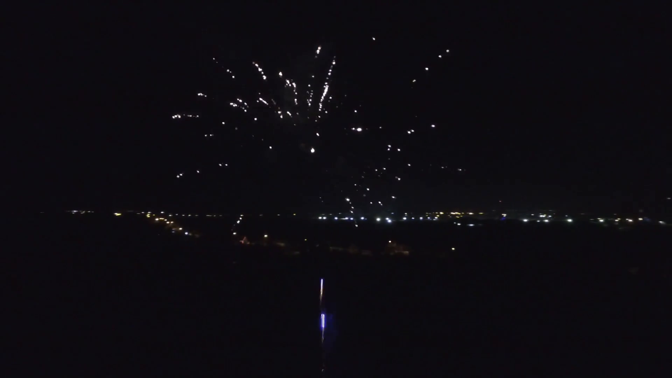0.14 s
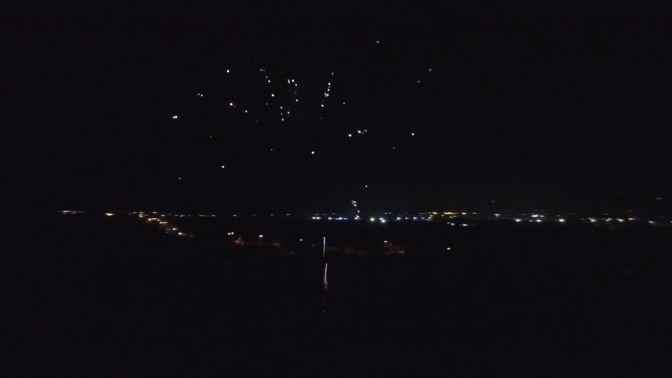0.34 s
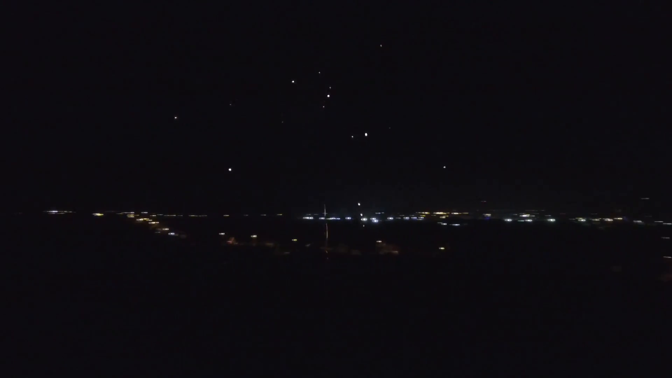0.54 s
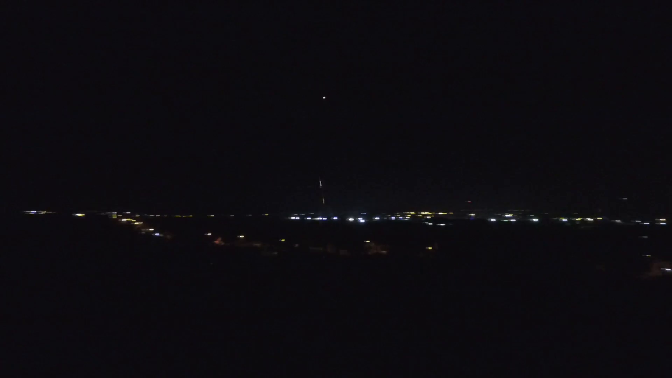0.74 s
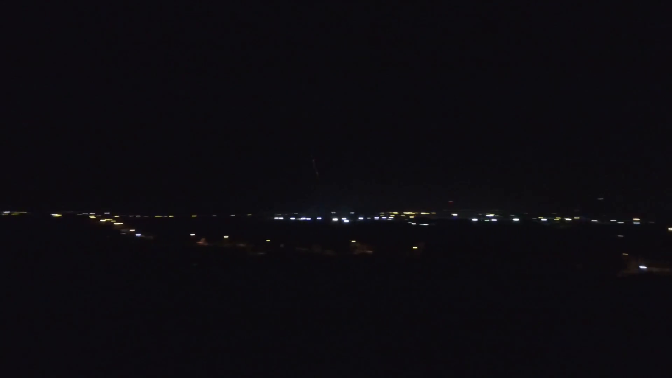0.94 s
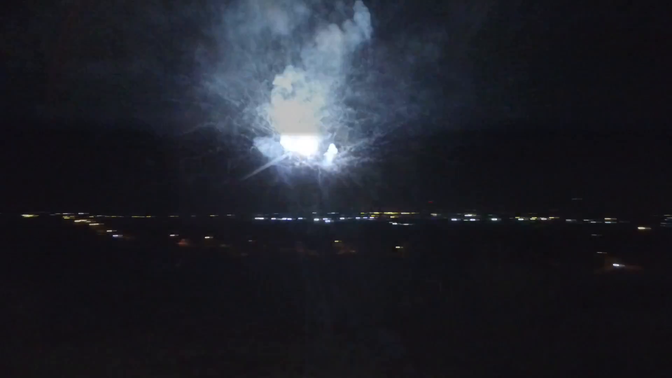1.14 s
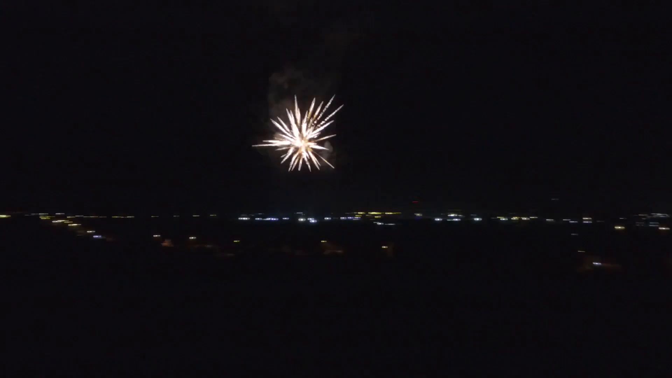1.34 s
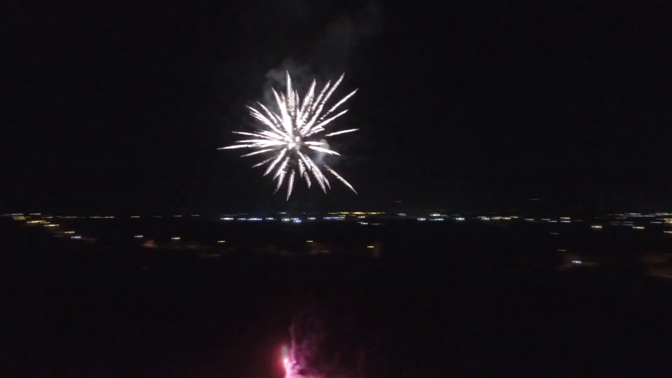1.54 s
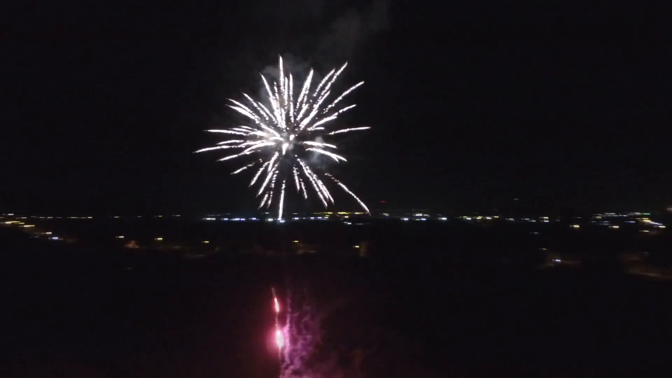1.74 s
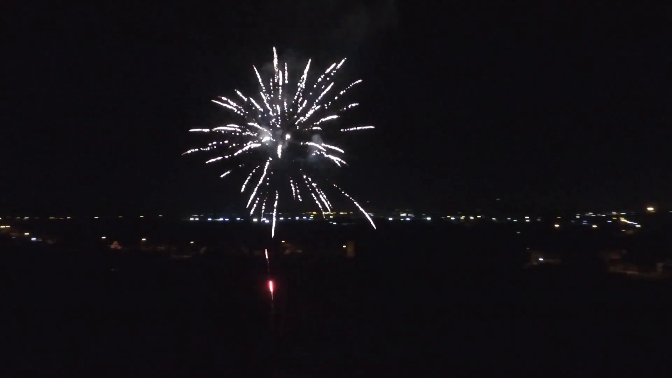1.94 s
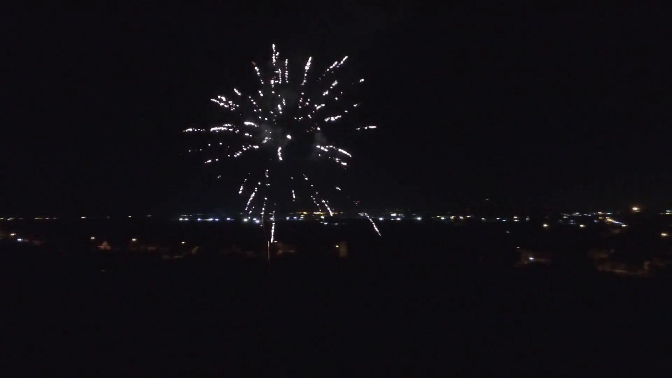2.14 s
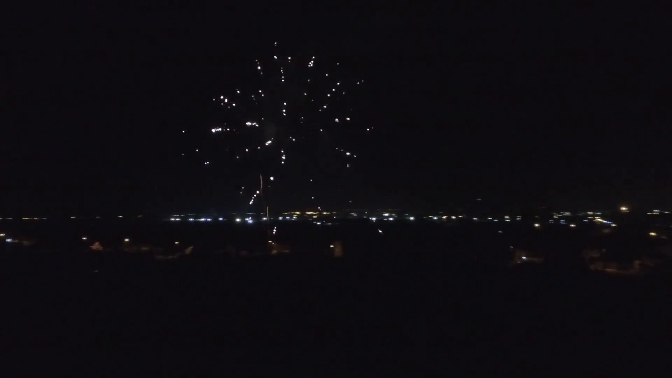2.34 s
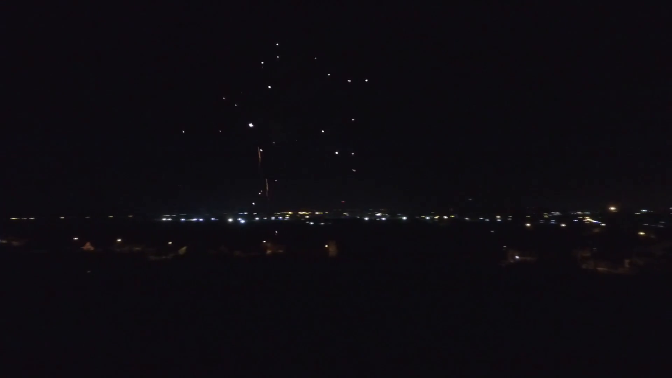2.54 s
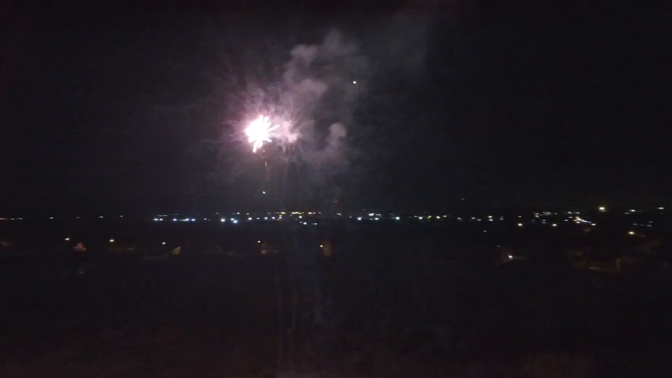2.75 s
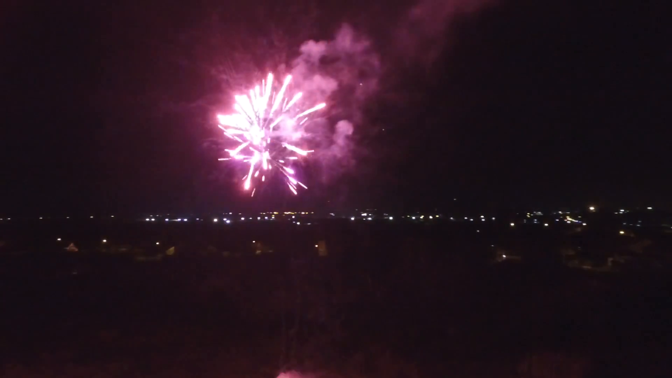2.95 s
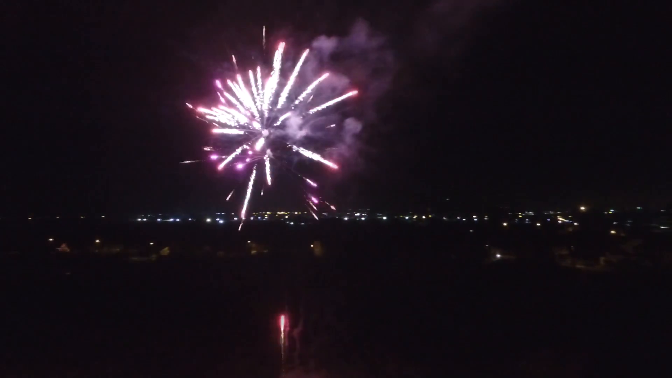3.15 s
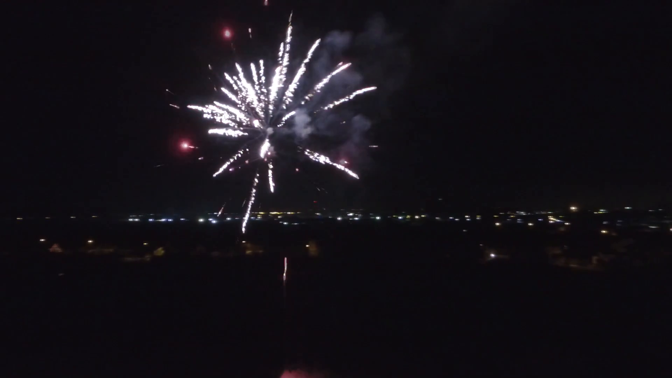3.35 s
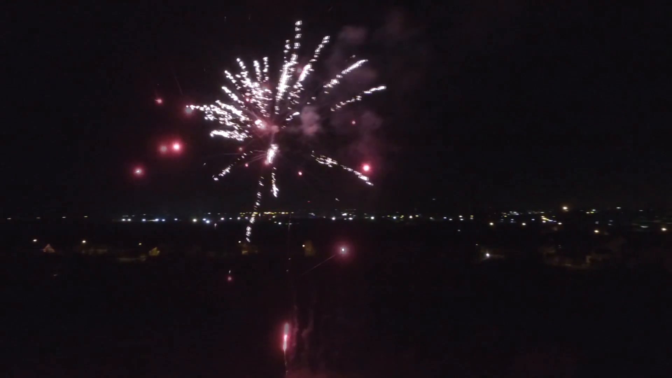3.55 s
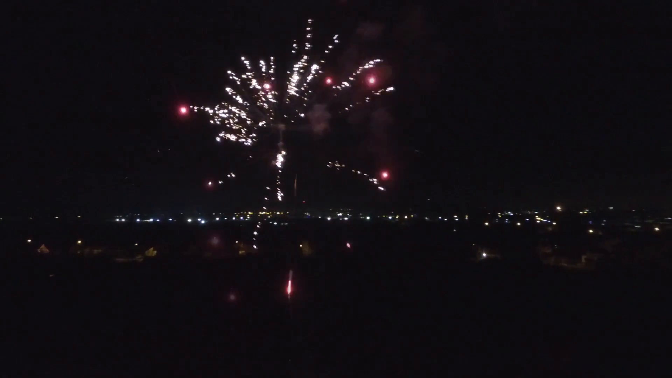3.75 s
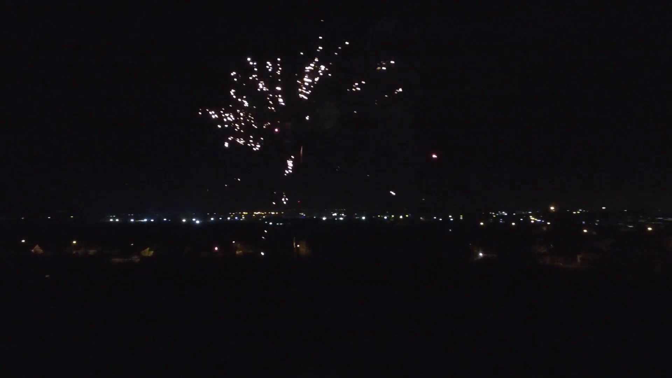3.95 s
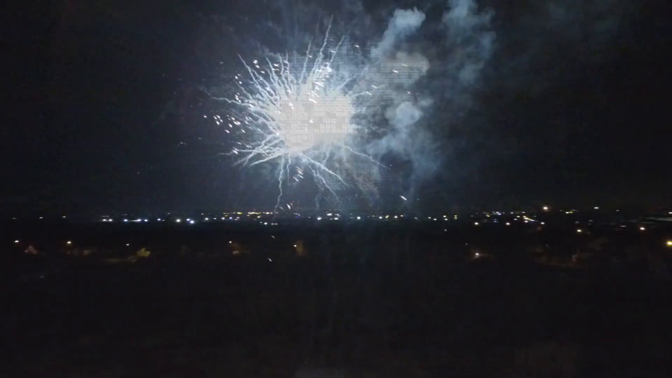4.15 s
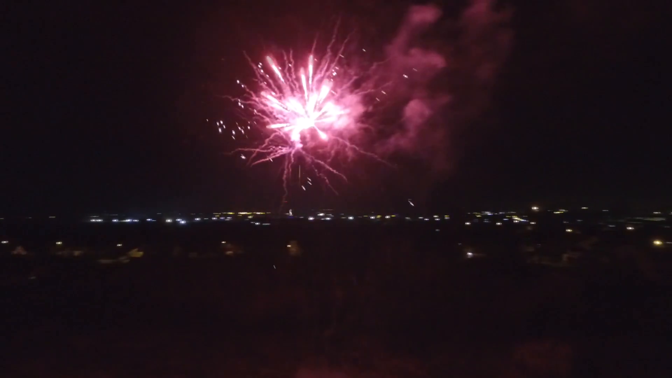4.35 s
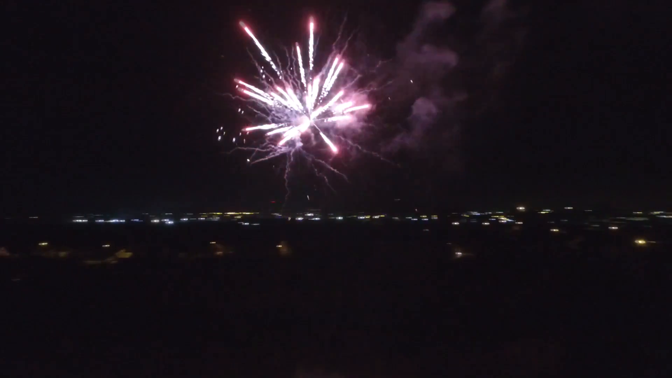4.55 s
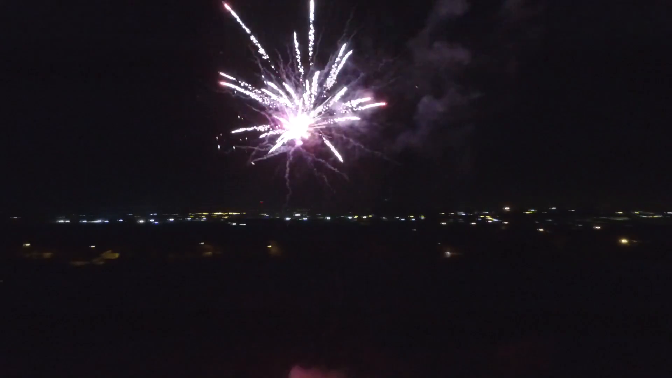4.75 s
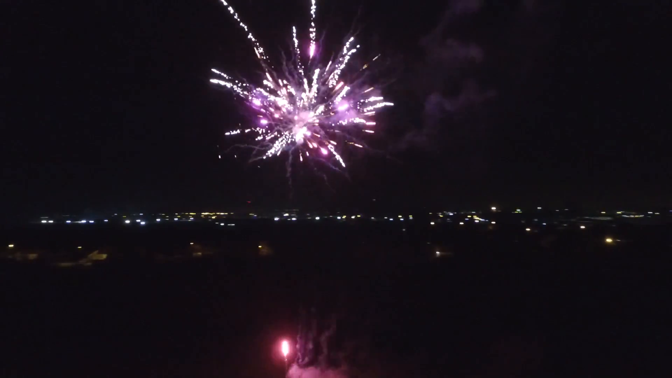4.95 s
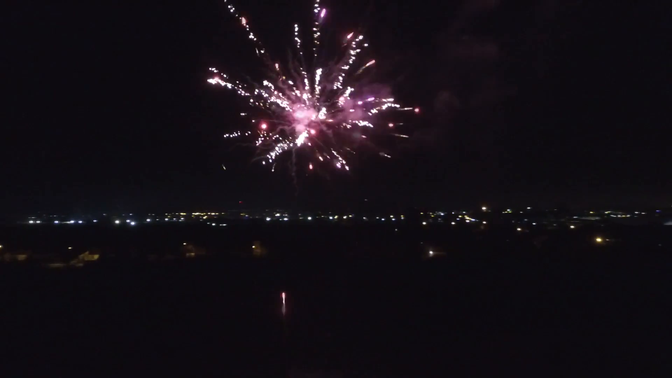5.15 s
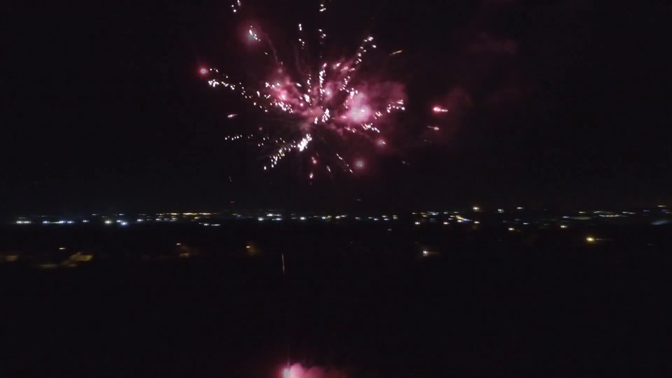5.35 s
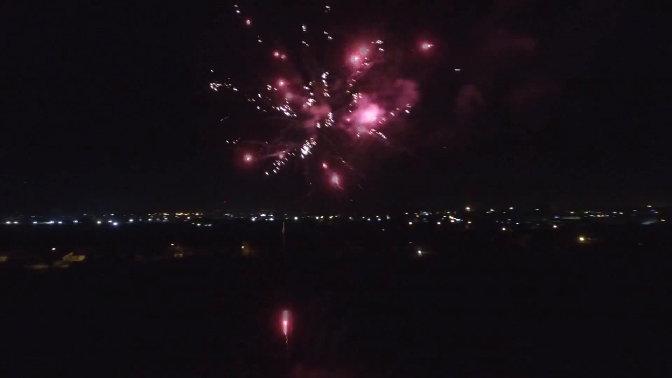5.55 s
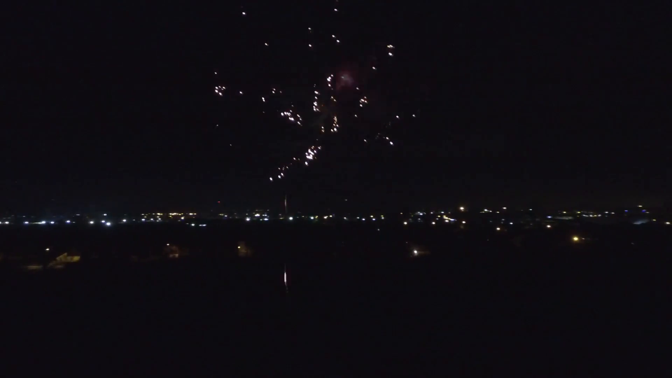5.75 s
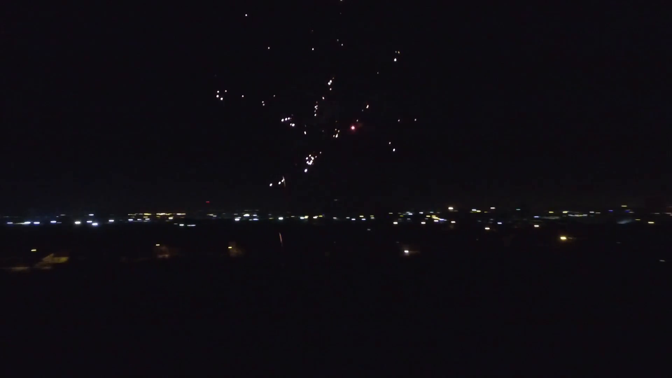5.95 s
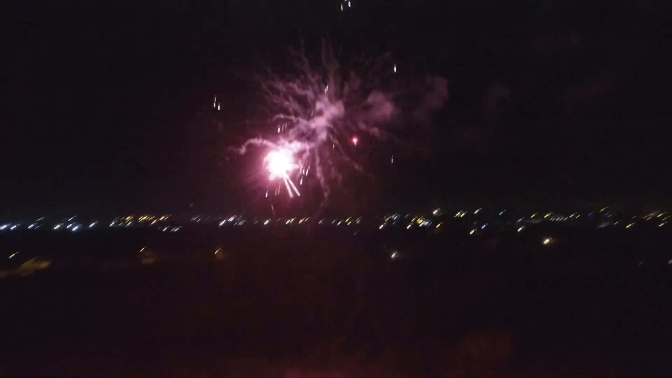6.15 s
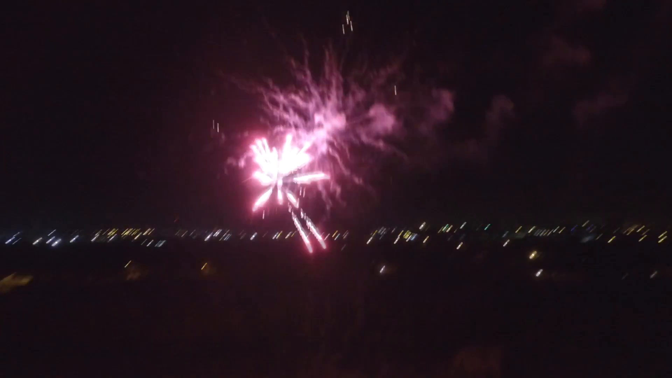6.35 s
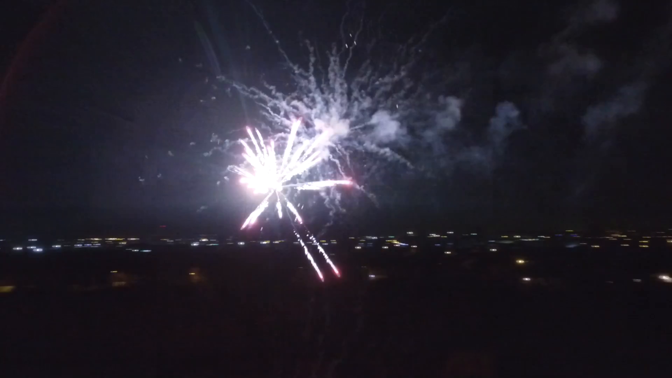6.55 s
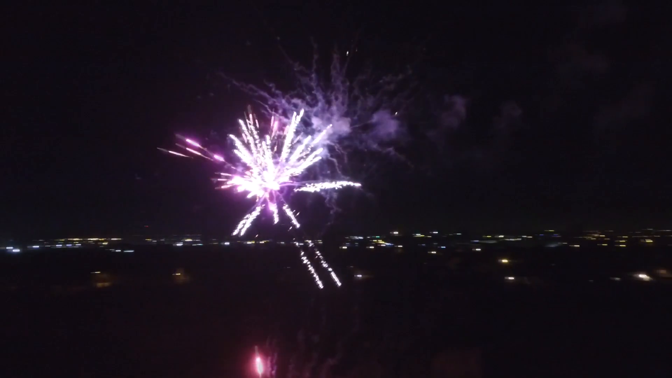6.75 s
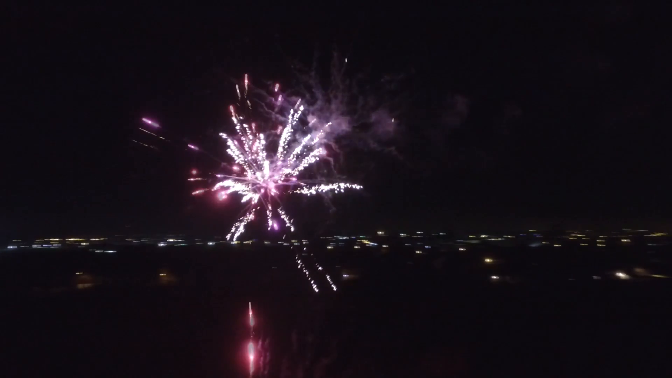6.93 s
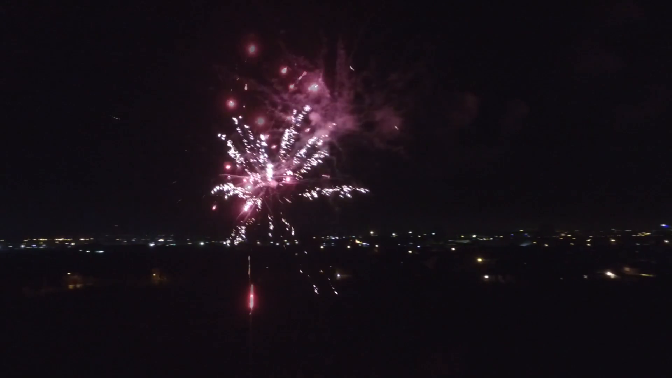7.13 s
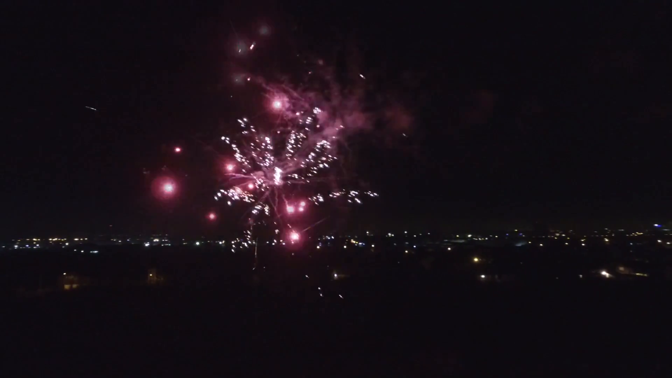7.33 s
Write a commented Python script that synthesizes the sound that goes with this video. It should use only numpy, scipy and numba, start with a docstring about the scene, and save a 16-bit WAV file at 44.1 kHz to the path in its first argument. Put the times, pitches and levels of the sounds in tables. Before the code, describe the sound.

Firework shells crack and thud overhead at night, often in quick pairs, over a sizzling fuse hiss and rolling echoes off a hillside.

```python
"""Sharp reports crack and thud on a hillside at night, over the hiss of a burning fuse and a long rolling answer.
A firework battery stands some tens of metres from a camera microphone. Fuse hiss and rolling land are coloured
noise; lift charges are noise cracks with a tube ring of decaying sines; shells overhead are a shock front and two
swings of thud, returned by the slope. The camera overloads on the fronts; its gain ducks, then creeps back up."""
import sys
import numpy as np
from scipy import signal
from scipy.fft import rfft, irfft
from scipy.io import wavfile
from scipy.ndimage import uniform_filter1d
from numba import njit

SR = 44100
rng = np.random.default_rng(int(sys.argv[2]) if len(sys.argv) > 2 else 0)


def convert_level_to_amplitude(level_db):
    """Map a level in decibels to its linear amplitude factor."""
    exponent = np.asarray(level_db, float) / 20
    return 10 ** exponent


def dump(signal):
    """Clip the signal to [-1, 1] and save it as 16-bit WAV at the path in sys.argv[1]."""
    limited = np.clip(np.atleast_2d(signal).T, -1, 1)
    pcm = np.round(limited * 32767).astype(np.int16)
    wavfile.write(sys.argv[1], SR, pcm)


N = 325894  # length in samples


def noise(colour, count=N):
    """Noise with the spectral shape of a colour table, scaled to rms 1."""
    hz, db = np.transpose(colour)
    f = np.fft.rfftfreq(count, 1 / SR) + 1
    shape = convert_level_to_amplitude(np.interp(np.log(f), np.log(hz), db))
    x = irfft(rfft(rng.standard_normal(count)) * shape, count)
    return x / x.std()


def add(out, start_s, sound):
    """Mixes a sound in from start_s on, cut at the ends of the scene."""
    i = int(round(start_s * SR))
    a, b = np.clip([i, i + len(sound)], 0, len(out))
    out[a:b] += sound[a - i:b - i]


def puff(colour, rise_ms, fall_ms):
    """A burst of noise that swells and dies away exponentially."""
    ms = np.arange(16384) / SR * 1000
    return noise(colour, count=16384) * (1 - np.exp(-ms / rise_ms)) * np.exp(-ms / fall_ms)


def walk(rate_hz):
    """Random levels, rate_hz of them a second, joined by straight slopes."""
    k = int(SR / rate_hz)
    return uniform_filter1d(np.repeat(rng.standard_normal(N // k + 1), k), k)[:N]


def band(hz, width_hz, level_db):
    """A narrow band of noise whose centre may drift: two slow random swings on a carrier."""
    phase = 2 * np.pi * np.cumsum(hz + np.zeros(N)) / SR
    slow = [(1, 0), (width_hz, -3), (3 * width_hz, -18), (20 * width_hz, -60)]
    return convert_level_to_amplitude(level_db) * (noise(slow) * np.sin(phase) + noise(slow) * np.cos(phase))


def patchy(x, spread_db, rate_hz):
    """Splits a sound into octaves that swell and sink each on its own."""
    octave, spectrum = np.log2(np.fft.rfftfreq(N, 1 / SR) + 1), rfft(x)
    out = np.zeros(N)
    for k in range(8, 14):  # octaves centred on 2 ** k Hz, the outer two left open
        share = np.clip(1 - np.abs(np.clip(octave, 8, 13) - k), 0, 1)
        out += convert_level_to_amplitude(spread_db * walk(rate_hz)) * irfft(spectrum * share, N)
    return out


# how fiercely the fuse burns: start_s [s], level_db [dB]
FUSE = [(0.0, -36.5), (.5, -32), (1.25, -36), (2.1, -26.5), (2.9, -27.5), (3.55, -30.5), (4.1, -27.5),
        (4.8, -27.5), (5.55, -34.5), (6.25, -31.5), (6.6, -32.5), (7.39, -31)]
# colour of the steady hiss: pitch_hz [Hz], level_db [dB per Hz, relative]
HISS = [(24, -50), (40, -12), (147, -1.5), (420, -9), (720, -5.5), (1000, -3.5), (1300, -7.5), (1700, -5.5),
        (2150, -16.5), (2500, -17), (2800, -10), (3800, -11.5), (4400, -9), (4700, -14.5), (5800, -8.5),
        (6400, -16), (9000, -17.5), (15000, -24.5), (15700, -45)]
# breathy bands, low to high: pitch_hz [Hz], half_width_hz [Hz], level_db [dB]
BANDS = [(991, 40, -7), (3307, 210, -8), (5150, 225, -4.5), (7200, 560, -10)]
# swells of the upper two bands: crest_s [s], level_db [dB]
SIZZLES = [(1.05, -2.5), (2.8, 1.5), (4.3, -4.5), (6.15, 1), (7.45, -7)]


def fuse():
    """Burning fuse: steady hiss, plus breathy bands that drift, the upper ones sizzling up and down."""
    rest_db, rise_s, fall_s = -10.5, 0.57, 0.35
    drift = 0.015  # share by which the band centres wander
    t = np.arange(N) / SR
    low, mid, high, top = (band(hz * (1 + drift * walk(3)), width_hz, db) for hz, width_hz, db in BANDS)
    sizzle = convert_level_to_amplitude(rest_db) + np.zeros(N)
    for crest_s, db in SIZZLES:
        sizzle += convert_level_to_amplitude(db) * np.exp(-((t - crest_s) / np.where(t < crest_s, rise_s, fall_s)) ** 2)
    level_db = np.interp(t, *np.transpose(FUSE)) + 3.1 * walk(6)
    return convert_level_to_amplitude(level_db) * (noise(HISS) + low + mid + sizzle * (high + top))


# stretches of land that answer a burst: delay_s [s], level_db [dB], spread_s [s]
LAND = [(0.021, 5.5, 0.015), (.092, 2.5, 0.019), (.23, 1.5, .035), (.37, -5.5, 0.11)]
# colour of the rolling answer: pitch_hz [Hz], level_db [dB per Hz, relative]
ROLL = [(24, -51), (40, -8.5), (263, 4), (412, -1), (514, -27), (1030, -4), (1570, 0.5), (5160, -14),
        (15000, -42)]
# colour of the low rumble: pitch_hz [Hz], level_db [dB per Hz, relative]
RUMBLE = [(80, -19), (220, -3), (330, -3.5), (550, -1.5), (900, -2.5), (2000, -54)]


def roll():
    """Sharp bursts roll back from the land around: dull, long and patchy, over a wavering rumble."""
    roll_db = -31.5  # against the burst
    far_db, far_rise_s, far_t60_s = -0.5, 0.09, 2.4  # the far country's share
    t, power = np.arange(N) / SR, np.zeros(N)
    for start_s, db, hz, _, _ in BURSTS:
        after = np.maximum(t - start_s, 0)
        near = sum(convert_level_to_amplitude(2 * g) * np.exp(-((after - delay_s) / spread_s) ** 2) for delay_s, g, spread_s in LAND)
        far = convert_level_to_amplitude(2 * (far_db - 60 * after / far_t60_s)) * (1 - np.exp(-after / far_rise_s))
        # amp of twice the dB gives power
        power += (t > start_s) * sharpness(hz) * convert_level_to_amplitude(2 * (db + roll_db)) * (near + far)
    rumble = convert_level_to_amplitude(-7 + 4.7 * walk(17)) * noise(RUMBLE)
    return np.sqrt(power) * (patchy(noise(ROLL), 3.8, 35) + rumble)


# dry ticks of burning stars: start_s [s], level_db [dB]
TICKS = [(1.552, 3.5), (5.86, -15)]
# colour of a tick: pitch_hz [Hz], level_db [dB per Hz, relative]
TICK = [(1500, -30), (3500, -1), (5500, 5), (12000, -16), (15500, -20)]


def ticks():
    """Burning stars snap: bright noise that dies away within milliseconds."""
    out = np.zeros(N)
    for start_s, db in TICKS:
        add(out, start_s, convert_level_to_amplitude(db) * puff(TICK, 0.27, 1.9))
    return out


# colour of the soft noise swelling just before a front: pitch_hz [Hz], level_db [dB per Hz, relative]
LEAD = [(35, -7), (60, 4.5), (200, -1), (900, -9.5), (1900, -10.5), (2400, -9.5), (3000, -8), (3500, -21.5),
        (6000, -31.5), (15600, -45)]


def lead_in(level_db, push):
    """Soft noise and a low push swell for some milliseconds and end at the front."""
    ahead = np.arange(1024)[::-1] / SR
    low_push = -np.sin(2 * np.pi * 55 * ahead) * np.exp(-ahead / 0.0035)
    soft_noise = noise(LEAD, count=1024) * np.exp(-ahead / 0.0065)
    return convert_level_to_amplitude(level_db) * (soft_noise + push * low_push)


# resonances of a tube: pitch_hz [Hz], level_db [dB], t60_s [s]
TUBE = [(562.7, 2.5, 0.12), (608.3, 5, 0.084), (707, 6.5, 0.06), (1203, 2.5, 0.13), (1767, -3.5, 0.092)]


def tube_ring(t):
    """Air in a tube rings at a few decaying pitches; every tube is a little different."""
    ring = np.zeros(len(t))
    # random shifts: level [dB], pitch [share], phase [rad]
    chance = rng.standard_normal((len(TUBE), 3)) * [1, 0.006, 9]
    for (hz, db, t60_s), (more_db, detune, phase) in zip(TUBE, chance):
        decay = convert_level_to_amplitude(db + more_db - 60 * t / t60_s)
        ring += decay * np.sin(2 * np.pi * hz * (1 + detune) * t + phase)
    return (1 - np.exp(-t / 0.0041)) * ring


# lift charges: start_s [s], level_db [dB], crack_decay_ms [ms], ring_db [dB], lead_in_db [dB]
LAUNCHES = [(-.018, 9, 8.8, -5.5, 0), (1.5039, 19, 4.9, 0.5, -8), (1.596, 12.5, 10.4, -1, -6),
            (3.0170, 17.5, 5.6, 0, -20), (3.4219, 17, 9.2, 4.5, 0.5), (4.8235, 8, 13, -1.5, -5),
            (5.3664, 10.5, 14, 1, -2.5), (6.619, 11, 9.1, -5, -1), (6.805, 15, 9.9, 0.5, -8)]
# what the hillside returns of every lift charge: delay_s [s], level_db [dB], rise_ms [ms], smear_ms [ms]
LAUNCH_ECHOES = [(.118, -20.5, 7.8, 31), (.311, -15, 0.48, 3.7), (.36, -25, 30, 45), (.445, -22, 1.4, 6)]
# colour of the crack: pitch_hz [Hz], level_db [dB per Hz, relative]
CRACK = [(35, -40), (60, -18.5), (292, -12.5), (676, -8), (2930, -17), (4560, -16), (6180, -21.5),
         (14600, -30.5), (15700, -52)]
# colour of its echoes: pitch_hz [Hz], level_db [dB per Hz, relative]
SLAP = [(59, -41), (100, -4), (565, -13.5), (1450, 0.5), (2450, -11), (3450, -23), (9000, -53),
        (11700, -58), (19800, -120)]


def launches():
    """Lift charges: a ragged crack of gas, the tube ringing after it, and a few faint echoes."""
    out, t = np.zeros(N), np.arange(8192) / SR
    for start_s, db, fall_ms, ring_db, lead_in_db in LAUNCHES:
        add(out, start_s - 1024 / SR, lead_in(lead_in_db, push=0.34))
        crack = convert_level_to_amplitude(db) * puff(CRACK, 0.55, fall_ms)
        tail = convert_level_to_amplitude(db - 16) * puff(CRACK, 2.6, 27.2)
        add(out, start_s, crack + tail)
        add(out, start_s + 0.004014, convert_level_to_amplitude(ring_db) * tube_ring(t))
        for delay_s, echo_db, rise_ms, smear_ms in LAUNCH_ECHOES:
            add(out, start_s + delay_s, convert_level_to_amplitude(echo_db) * puff(SLAP, rise_ms, smear_ms))
    return out


def sharpness(hz):
    """Deeper, slower bursts arrive without a sharp front (0), higher ones with it (1), others between."""
    return np.clip((hz - 260) / 40, 0, 1)


# shells bursting overhead: start_s [s], level_db [dB], pitch_hz of the thud [Hz],
# echo_s, delay of the slope echo [s], lead_in_db [dB]
BURSTS = [(1.3476, -7, 248, .240, -31), (1.361, 8.5, 314, 0.27, 0), (1.4743, 10.5, 299, 0.24, -6),
          (2.9047, 12.5, 245, 0.25, -35.5), (2.9138, 9, 304, 0.24, 5.5), (3.0107, 14.5, 304, .235, -7),
          (4.3802, 11.5, 302, .227, 3.5), (4.9018, 12.5, 305, .23, -1), (6.3016, 9.5, 324, 0.25, 0.5),
          (6.742, 11.5, 301, .24, -10)]
# colour of the scatter off the ground: pitch_hz [Hz], level_db [dB per Hz, relative]
SCATTER = [(35, -37), (60, -18), (434, 12), (815, -1), (1160, -4), (2730, -0.5), (7440, -12.5),
           (13000, -20.5), (15700, -33)]
# colour of the wash off the slope: pitch_hz [Hz], level_db [dB per Hz, relative]
ECHO = [(35, -40), (60, -19), (190, 2), (785, -2.5), (1370, -2.5), (2040, -26), (3870, -20.5), (12000, -51),
        (15600, -74), (22000, -120)]


def bursts():
    """Shells: a shock front, two swings of thud, scatter off the ground, then one echo off the facing slope."""
    out, t = np.zeros(N), np.arange(1024) / SR
    for start_s, db, hz, echo_s, lead_in_db in BURSTS:
        swings = hz * t
        sharp = sharpness(hz)
        front = 3.6 * sharp * np.exp(-t / 0.000043)
        thud = -np.cos(2 * np.pi * swings) * np.exp(-(swings / 1.95) ** 6)
        thud *= 1 - (1 - sharp) * np.exp(-t / 0.00071)  # a dull burst eases in
        add(out, start_s - 1024 / SR, lead_in(lead_in_db, push=1.4))
        add(out, start_s, convert_level_to_amplitude(db) * (front + thud))
        scatter = convert_level_to_amplitude(db - 8) * puff(SCATTER, 1.9, 8.5) + convert_level_to_amplitude(db - 20.5) * puff(SCATTER, 3.6, 39)
        add(out, start_s + 0.00094, scatter)
        add(out, start_s + 0.00591, convert_level_to_amplitude(db - 29) * puff(RUMBLE, 10, 46))
        # the slope returns the thud with its front worn off, inside a wash
        worn = thud * np.hanning(len(t) // 2).repeat(2) ** 0.15
        add(out, start_s + echo_s + 0.0035, convert_level_to_amplitude(db - 22) * worn)
        add(out, start_s + echo_s, convert_level_to_amplitude(db - 17) * puff(ECHO, 3.6, 13.8))
    return out


def scene():
    """Fuse, hillside, battery and sky together, on one channel."""
    return (fuse() + roll() + ticks() + launches() + bursts())[None]


@njit
def follow(x, start, attack, release):
    """Envelope follower: moves by a share of the gap each sample, quick up and slow down."""
    out, e = np.empty(len(x)), start
    for i in range(len(x)):
        e += (x[i] - e) * (attack if x[i] > e else release)
        out[i] = e
    return out


def band_limit(x):
    """A steep low-pass at the top of the band."""
    return signal.sosfilt(signal.butter(12, 15830, fs=SR, output="sos"), x)


def record(dry):
    """Camera microphone: a slow and a quick gain control react a moment late; fronts get past and clip."""
    late = int(0.005 * SR)
    size = np.abs(np.concatenate([dry[0, :late], dry[0, :-late]]))
    # attack and release are one over a time constant in samples
    slow = follow(size, 1.75, 1 / (0.0076 * SR), 1 / (1.1 * SR))
    quick = follow(size, 0.39, 1 / (0.0027 * SR), 1 / (0.08 * SR))
    gain = np.minimum(0.12 / slow, 1) ** 0.61 * np.minimum(0.076 / quick, 1) ** 0.062
    lowpass = signal.ellip(8, 0.2, 45, 15550, fs=SR, output="sos")
    mix = np.clip(signal.sosfilt(lowpass, convert_level_to_amplitude(6) * gain * dry), -1, 1)
    return band_limit(mix)


dry = scene()
out = record(dry)
dump(out)
```